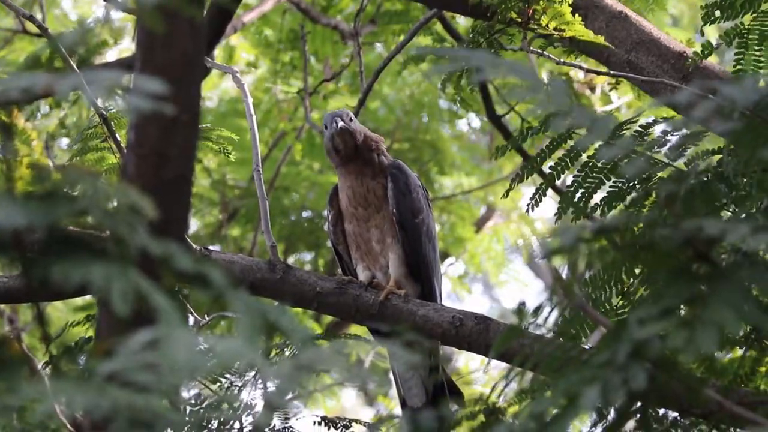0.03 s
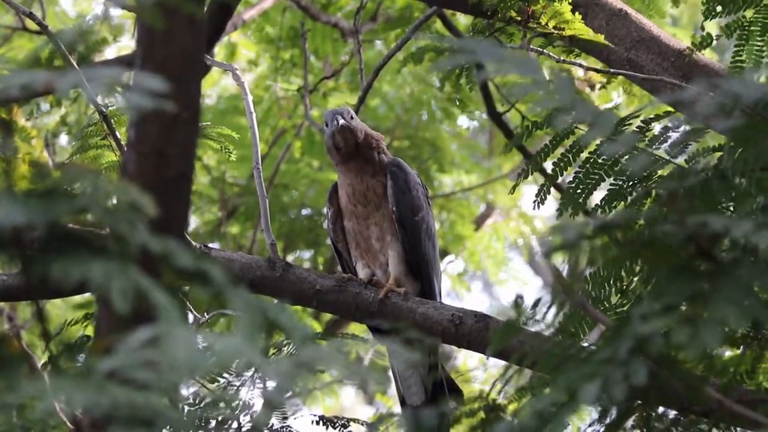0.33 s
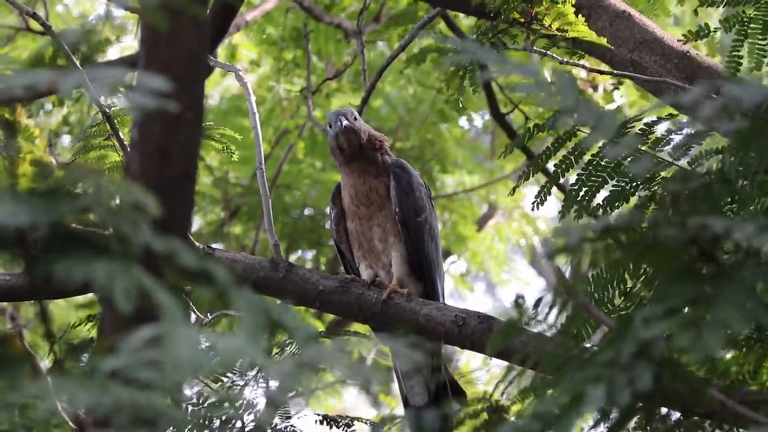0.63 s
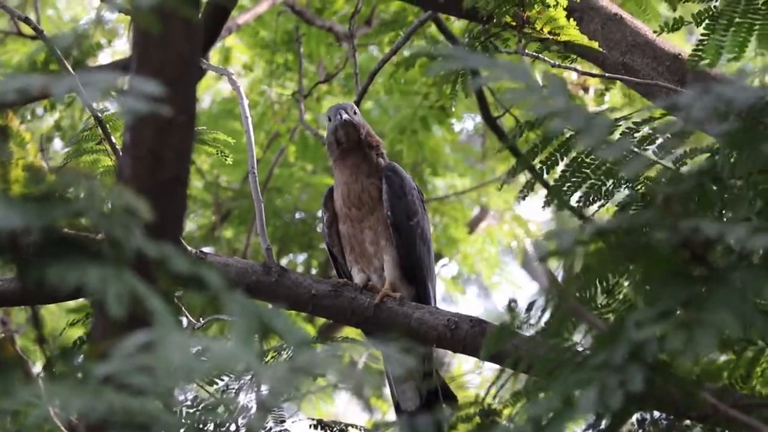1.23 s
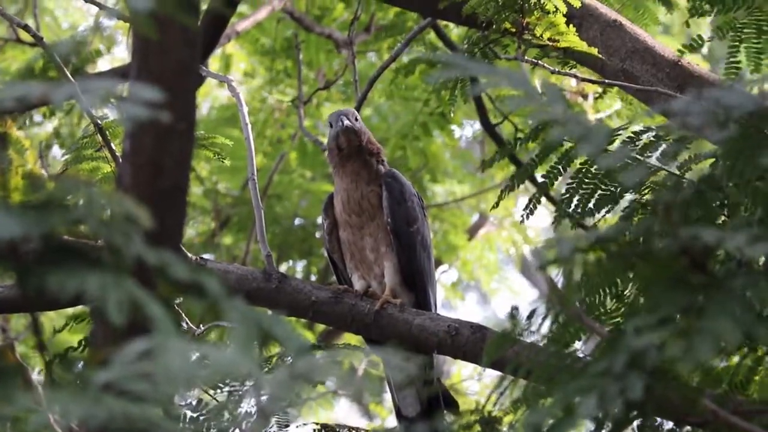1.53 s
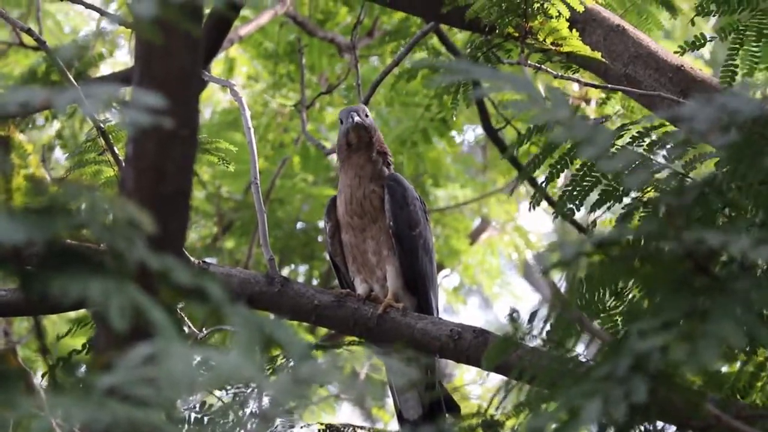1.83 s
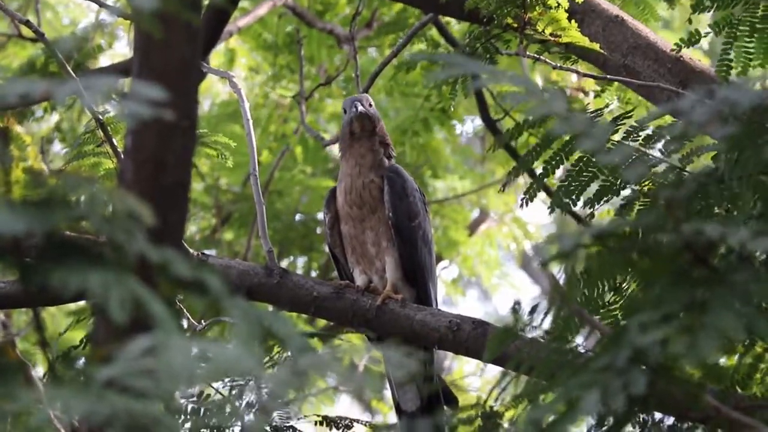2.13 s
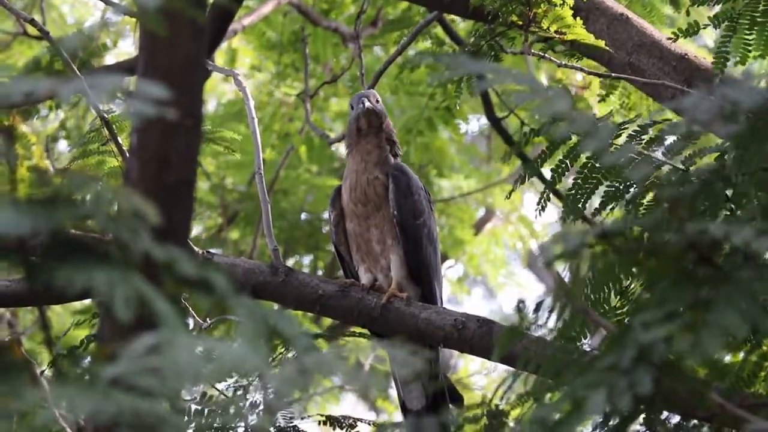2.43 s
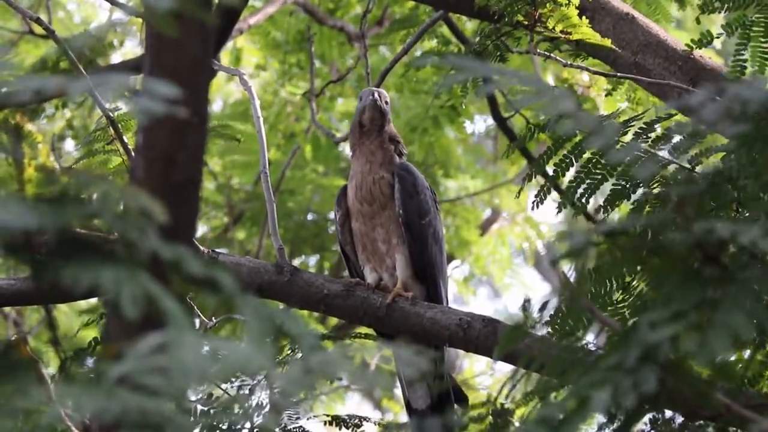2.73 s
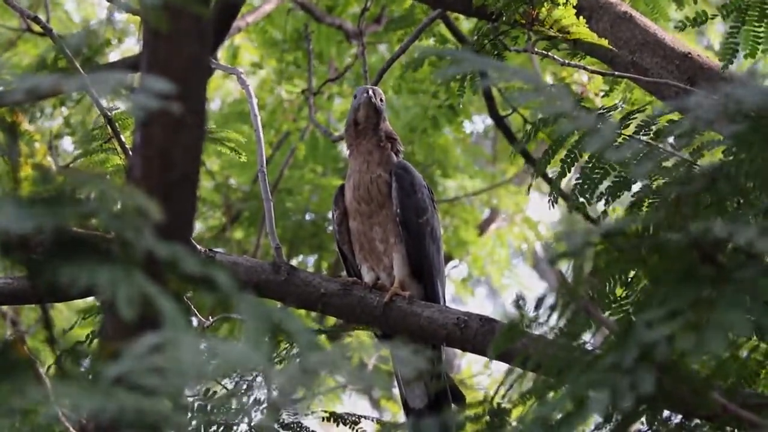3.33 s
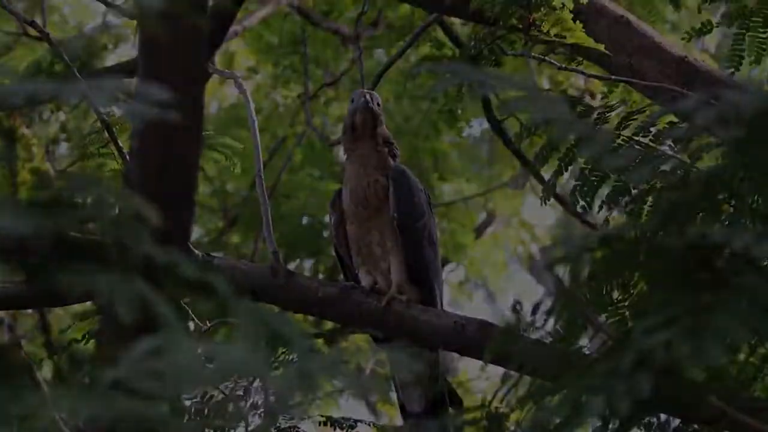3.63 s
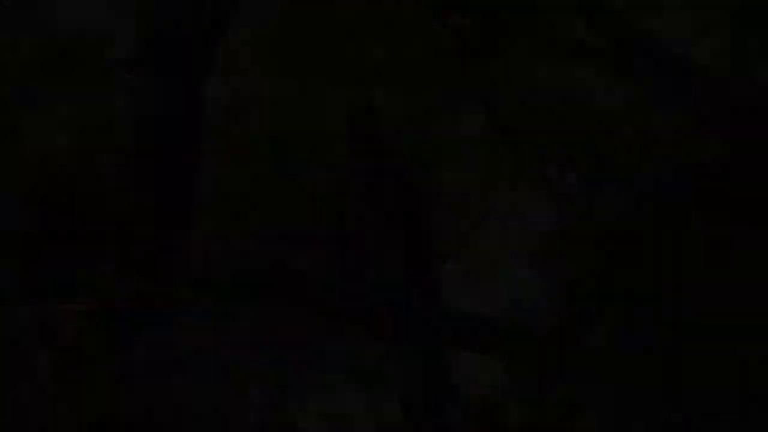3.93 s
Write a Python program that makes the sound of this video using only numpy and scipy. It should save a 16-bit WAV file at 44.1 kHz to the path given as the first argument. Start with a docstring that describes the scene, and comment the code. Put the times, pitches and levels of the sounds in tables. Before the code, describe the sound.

Birds squawk among trees, slightly to the right, each ringing call arching and falling into a rasp. One sounds at the start, a quick run from 0.8 to 1.9 seconds, and three more from 3 to 4, with farther calls near 0.4 and 2.2. Faint thin chirps come on the right around 0.7, 2.7 and 3.4. A distant engine thuds throughout under a steady hiss of town and leaves.

```python
"""Birds squawking in a grove

Arched, harmonic calls grow harsher as they fall and ring among the trees. A small bird slides
thin chirps downward on the right. Far off a slow single-cylinder engine thuds, one exhaust
pulse per firing, under the steady hiss of town and leaves."""
import sys
import numpy as np
from scipy import signal
from scipy.fft import rfft, irfft
from scipy.io import wavfile

SR = 44100
rng = np.random.default_rng(int(sys.argv[2]) if len(sys.argv) > 2 else 0)


def int16_out(signal):
    """Quantize to a 16-bit WAV file."""
    q = np.round(np.clip(np.atleast_2d(signal).T, -1, 1) * 32767)
    wavfile.write(sys.argv[1], SR, q.astype(np.int16))


N = 176400
TIME_S = np.arange(N) / SR
BINS_HZ = np.arange(N // 2 + 1) * SR / N
TOP_HZ = 15500
EARS = np.array([[1], [-1]])  # left, right


def undb(db):
    """Decibels to gain."""
    return 10 ** (np.asarray(db) / 20)


def unit(x):
    """Scale to rms 1."""
    return x / np.sqrt(np.mean(x ** 2))


def curve(table, t, column=1):
    """Table column, interpolated over time."""
    rows = np.array(table, float)
    return np.interp(t, rows[:, 0], rows[:, column])


def spectrum(table, hz, column=1):
    """Table column, interpolated over log frequency."""
    rows = np.array(table, float)
    return np.interp(np.log(np.maximum(hz, 1)), np.log(rows[:, 0]), rows[:, column])


def wander(rate_hz):
    """Smooth noise of rms 1, rolled off above rate_hz."""
    return unit(irfft(rfft(rng.standard_normal(N)) / (1 + (BINS_HZ / rate_hz) ** 2), N))


def squawks(calls, harmonics=10, attack_s=.0076, release_s=.01):
    """Harmonics shaped by throat and beak; overtones swell late, flutter, smear and fray into rasp."""
    # throat and beak response: freq_hz, gain_db
    throat = [(1100, -7.5), (1750, -6), (2100, -5.5), (2400, 0.5), (3100, -4), (3700, -4.5), (4300, 2),
              (4900, -1.5), (5700, -8), (7000, -9.5), (9500, -19), (12000, -21), (15500, -37)]
    # throat hiss spectrum: freq_hz, density_db
    hiss_shape = [(900, -15), (1700, 0), (5000, 2.5), (7000, -12), (12500, -10), (15500, -35)]
    dull_db, rasp_db, brightest_at = -22, -4, .6
    hiss = unit(irfft(rfft(rng.standard_normal(N)) * undb(spectrum(hiss_shape, BINS_HZ)), N))
    jitter = .035 * wander(220)
    flutter = [3.5 * wander(110) for _ in range(harmonics)]
    smear = [.2 * min(k, 3) * wander(260) for k in range(harmonics)]
    out = np.zeros(N)
    for overtones_db, course in calls:
        start_s, end_s = course[0][0], course[-1][0]
        on = (TIME_S > start_s) & (TIME_S < end_s)
        t = TIME_S[on]
        progress = (t - start_s) / (end_s - start_s)
        pitch_hz, level_db = curve(course, t), curve(course, t, column=2)
        rough = np.clip(curve(course, t, column=3), 0, 1)
        phase = 2 * np.pi * np.cumsum(pitch_hz * (1 + rough * jitter[on])) / SR
        bright = undb(overtones_db + dull_db * np.minimum(progress / brightest_at - 1, 0) ** 2)
        voice = 0
        for k in range(1, harmonics + 1):
            gain_db = spectrum(throat, k * pitch_hz) + (.5 + rough) * flutter[k - 1][on]
            gain = undb(gain_db) * (bright if k > 2 else 1) * (k * pitch_hz < TOP_HZ)
            voice += gain * np.sin(k * phase + (.5 + 2 * rough) * smear[k - 1][on])
        rasp = undb(rasp_db) * np.sqrt(bright) * rough * hiss[on] * (1 + np.cos(phase) / 2)
        attack = np.minimum((t - start_s) / attack_s, 1)
        release = np.sqrt(np.minimum((end_s - t) / release_s, 1))
        out[on] += attack * release * (voice * (1 - rough ** 2 / 2) + rasp) * undb(level_db)
    return out


def big_birds(wet_db=-.5):
    """Near and far callers ringing in the grove, a little to the right."""
    # calls: overtones_db, rows of (time_s, pitch_hz, level_db, roughness 0-1)
    near_calls = [(-4, [(-.15, 2300, -34, .1), (0, 2387, -27.5, 0.25), (.03, 2258, -36, 0.15),
                  (.055, 2127, -33, 0.42), (.074, 1090, -35, 0.6)]), (1, [(.845, 1810, -43, .2),
                  (.875, 2205, -36.5, 0.2), (.92, 2449, -34.5, 0.14), (.97, 2408, -34.5, 0.08),
                  (1.03, 2280, -31.5, 0.22), (1.07, 2130, -33, 0.27), (1.092, 1847, -36.5, 0.36),
                  (1.13, 898, -38, 0.7)]), (-5, [(1.188, 1960, -37, 0.16), (1.208, 2250, -32.5, .1),
                  (1.232, 2160, -30.5, 0.32), (1.25, 1940, -35, 0.2), (1.272, 1751, -33.5, 0.6),
                  (1.302, 1000, -35.5, .7)]), (2, [(1.498, 1996, -37, 0.12), (1.52, 2460, -36, 0),
                  (1.555, 2386, -34, 0.17), (1.585, 2254, -29.5, 0.14), (1.635, 2168, -31, 0.46),
                  (1.68, 1980, -32, .9), (1.745, 1794, -35, 0.86), (1.785, 1194, -40.5, .9)]),
                  (1, [(1.7, 2100, -40, 0.69), (1.745, 2177, -40, 0.73), (1.81, 2042, -36, 0.5),
                  (1.858, 1474, -38, 0.5), (1.885, 1000, -40, .7)]), (2, [(2.955, 1200, -50, .2),
                  (2.972, 1960, -44, 0.2), (2.988, 2210, -36, 0), (3.037, 2360, -34, 0.16),
                  (3.115, 2157, -34.5, 0.23), (3.138, 2049, -34.5, 0.3), (3.162, 1796, -41.5, .4),
                  (3.19, 960, -40.5, .6)]), (-8, [(3.345, 1298, -52, .2), (3.365, 1906, -45, 0.12),
                  (3.395, 2153, -36, 0.06), (3.418, 2083, -32, .2), (3.46, 1680, -45, 0.2),
                  (3.487, 1094, -36, 0.7)]), (0.5, [(3.742, 1896, -44, 0.17), (3.772, 2248, -37, 0),
                  (3.82, 2080, -36, 0.22), (3.88, 1966, -37.5, 0.15), (3.915, 1820, -40, 0.4),
                  (3.955, 1055, -41, 0.74)])]
    far_calls = [(-9, [(.33, 2095, -36.5, 1), (.43, 1810, -39.5, 0.85)]), (-13, [(2.13, 2232, -40.5, .6),
                 (2.25, 1917, -38, 0.47)])]
    # stereo image of the calls: freq_hz, left_minus_right_db, right_lead_rad
    image = [(1000, 6, 0.88), (2210, -5, 0.7), (4400, -2.5, 1), (6400, -1.5, 1), (9000, -2.5, 0)]
    calls = squawks(near_calls) + squawks(far_calls)
    ringing = calls + undb(wet_db) * grove(calls)
    balance = undb(EARS * spectrum(image, BINS_HZ) / 2)
    phase_shift = np.exp(-1j * EARS * spectrum(image, BINS_HZ, column=2) / 2)
    return irfft(rfft(ringing) * balance * phase_shift, N)


def small_bird(floor_hz=5270, wet_db=3, left_minus_right_db=-16.5):
    """Thin wavering whistles that hold their top note, drop and level off."""
    # chirps: start_s, top_hz, fall_s, level_db
    chirps = [(.708, 7200, .018, -48.5), (2.668, 7100, 0.015, -47), (2.745, 6750, 0.029, -49.5),
              (3.308, 7800, 0.022, -45), (3.513, 7200, 0.023, -49)]
    waver = 1 + .02 * wander(190)
    out = np.zeros(N)
    for start_s, top_hz, fall_s, level_db in chirps:
        length_s = 2 * fall_s
        on = (TIME_S > start_s) & (TIME_S < start_s + length_s)
        t = TIME_S[on] - start_s
        pitch_hz = (floor_hz + (top_hz - floor_hz) / (1 + (t / fall_s) ** 4)) * waver[on]
        envelope = undb(level_db) * np.sqrt(np.sin(np.pi * t / length_s))
        out[on] += envelope * np.sin(2 * np.pi * np.cumsum(pitch_hz) / SR)
    return (out + undb(wet_db) * grove(out)) * undb(EARS * left_minus_right_db / 2)


def grove(x, t60_s=.52, early_s=.0065, early_db=5, cutoff_hz=7440):
    """Trunks and leaves scatter the sound: a quick cluster of echoes, then a dull tail."""
    t = np.arange(SR) / SR
    envelope = undb(-60 * t / t60_s) + undb(early_db) * np.exp(-t / early_s)
    echoes = unit(rng.standard_normal((2, SR)) * envelope) / np.sqrt(SR)
    echoes = signal.sosfilt(signal.butter(2, cutoff_hz, fs=SR, output="sos"), echoes)
    return signal.fftconvolve(x[None], echoes, axes=1)[:, :N]


def engine(scatter_db=.07, start_cycles=.29):
    """Every firing gives one dull thud in a heavily damped exhaust."""
    # engine speed: time_s, firing_hz
    speed = [(0.0, 18.98), (0.3, 18.81), (0.65, 18.36), (0.8, 19.15), (1.2, 18.81), (2.1, 19.84),
             (3.0, 20.53), (4.0, 21.02)]
    # exhaust: time_s, resonance_hz, level_db
    exhaust = [(0, 188, -44), (.8, 196, -45), (1.5, 140, -42), (3, 116, -46)]
    cycles = np.cumsum(curve(speed, TIME_S)) / SR + start_cycles
    hz = np.arange(1, SR // 20 + 1) * 10  # bins of a 0.1 s thud
    out = np.zeros(N + SR)
    for i in np.flatnonzero(np.diff(np.floor(cycles))):
        resonance_hz = curve(exhaust, i / SR)
        pipe = 1 / (1 + 1j * (hz / resonance_hz - resonance_hz / hz))  # band-pass, Q = 1
        thud = unit(irfft(np.r_[0, pipe ** 3])) / np.sqrt(2)
        level_db = curve(exhaust, i / SR, column=2) + scatter_db * rng.standard_normal()
        out[i:i + len(thud)] += thud * undb(level_db)
    return out[:N]


def town_and_leaves(level_db=-37.5, flicker_db=1.5, middle_hz=716, bands=19):
    """Noise in flickering half-octave bands, alike in both ears in the bass, diffuse in the middle."""
    # noise spectrum: freq_hz, density_db
    shape = [(25, -25), (40, -6.5), (54, -7.5), (100, 1.5), (200, 0.5), (330, -1.5), (520, -3.5), (740, 2),
             (880, -5), (1100, 0.5), (1350, -3), (1600, -3.5), (2400, -4.5), (3100, -9), (4400, -7.5),
             (5800, -12.5), (8000, -20.5), (12000, -26.5), (15000, -36)]
    # stereo image: freq_hz, correlation, left_minus_right_db
    image = [(206, 0.93, 0.5), (1220, 0.04, 0), (2530, -.1, -8.5), (4850, 0, -2.5), (8050, 0.97, -1.5)]
    # drift of treble hiss, deep rumble and lower middle: time_s, gain_db
    hiss = [(0, 3), (4, -0.5)]
    rumble = [(0, 0), (2.2, -9.5), (3, 9.5), (4, 5)]
    middle = [(0, 2), (1.5, -1.5), (4, -0.5)]
    correlation = spectrum(image, BINS_HZ)
    mid, side = rfft(rng.standard_normal((2, N)))
    noise = mid * np.sqrt(1 + correlation) + EARS * side * np.sqrt(1 - correlation)
    noise *= undb(spectrum(shape, BINS_HZ) + EARS * spectrum(image, BINS_HZ, column=2) / 2)
    noise *= (BINS_HZ > 20) & (BINS_HZ < TOP_HZ)
    noise /= np.std(irfft(noise, N))
    band = np.clip(np.floor(2 * np.log2(np.maximum(BINS_HZ, 20) / 20)), 0, bands - 1)
    out = 0
    for k in range(bands):
        centre_hz = 20 * 2 ** ((k + .5) / 2)
        gain_db = flicker_db * wander(15.7)
        gain_db += curve(hiss, TIME_S) * min(centre_hz / 2500, 1)
        gain_db += curve(rumble, TIME_S) / (1 + (centre_hz / 90) ** 2)
        gain_db += curve(middle, TIME_S) * np.exp(-(2 * np.log2(centre_hz / middle_hz)) ** 2)
        out += irfft(noise * (band == k), N) * undb(gain_db)
    return out * undb(level_db)


def scene():
    """Birds over the far engine, town and leaves."""
    return big_birds() + small_bird() + engine() + town_and_leaves()


def record(dry):
    """Steep low-pass at TOP_HZ."""
    return signal.sosfilt(signal.ellip(8, .2, 70, TOP_HZ, fs=SR, output="sos"), dry)


dry = scene()
out = record(dry)
int16_out(out)
```